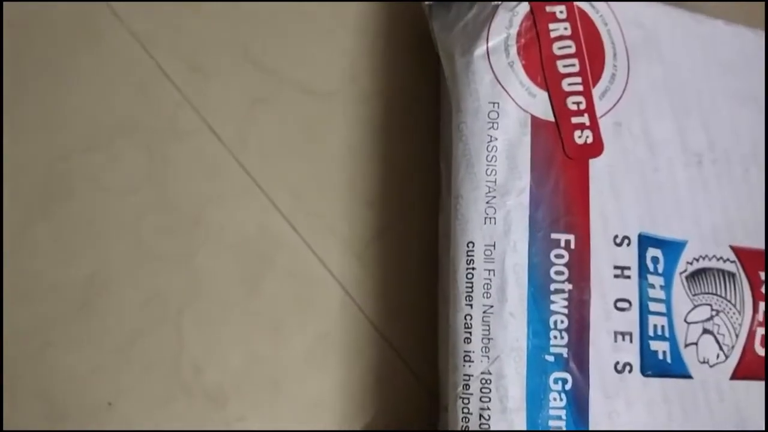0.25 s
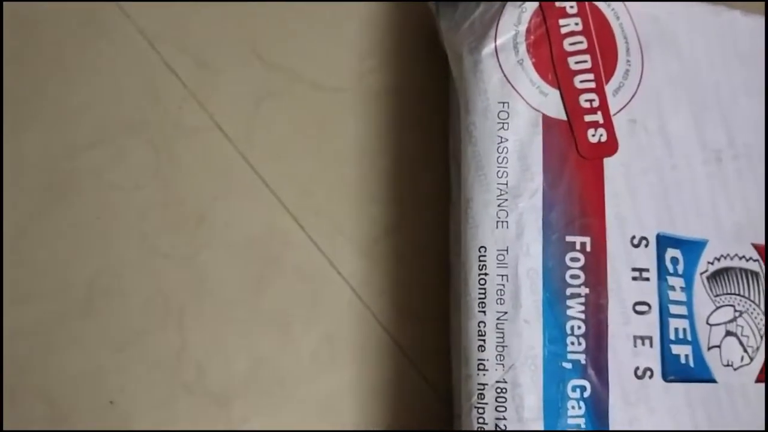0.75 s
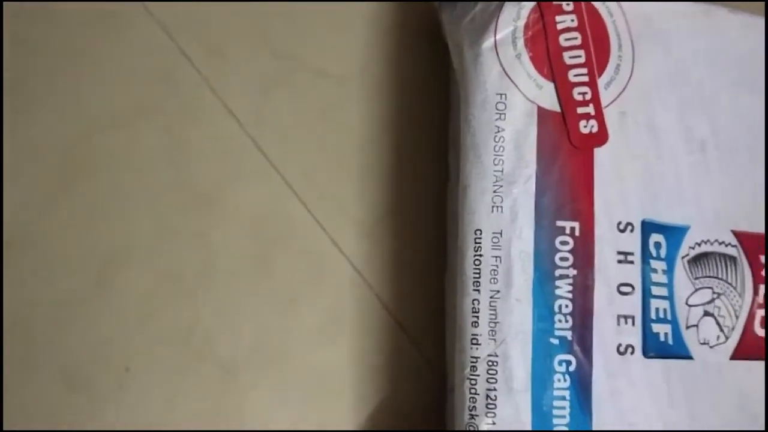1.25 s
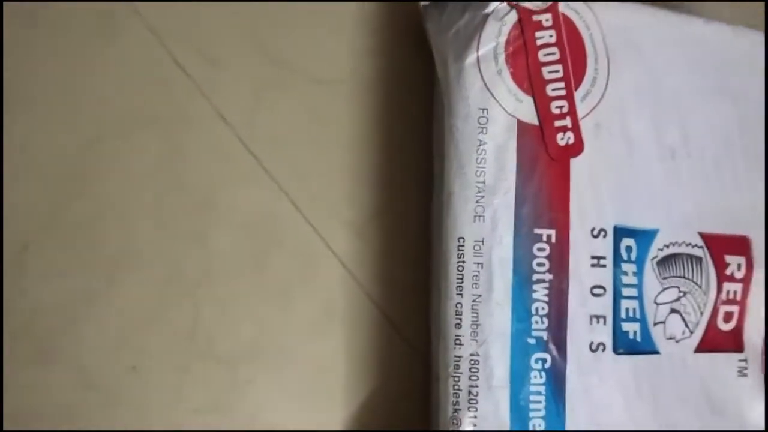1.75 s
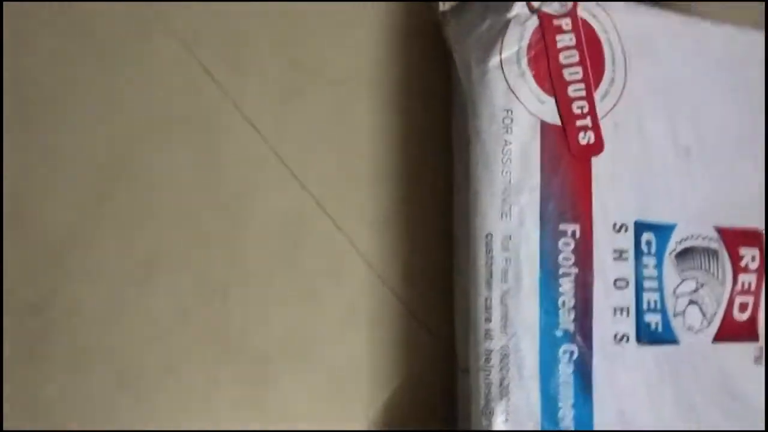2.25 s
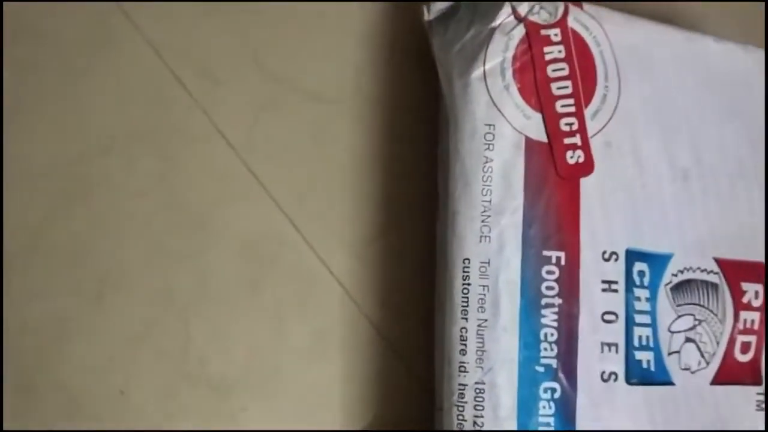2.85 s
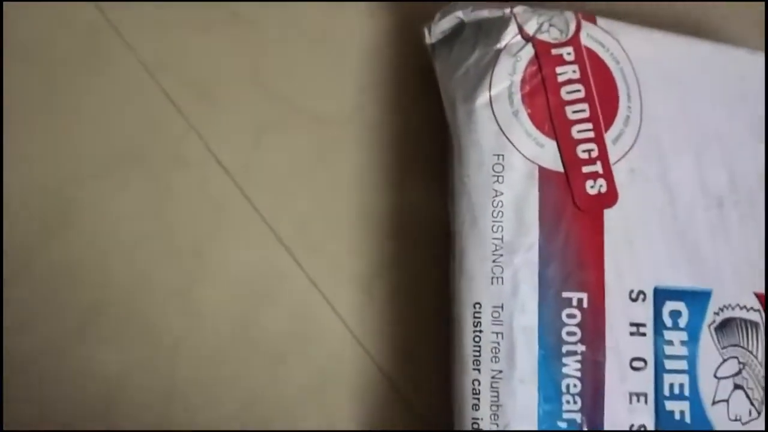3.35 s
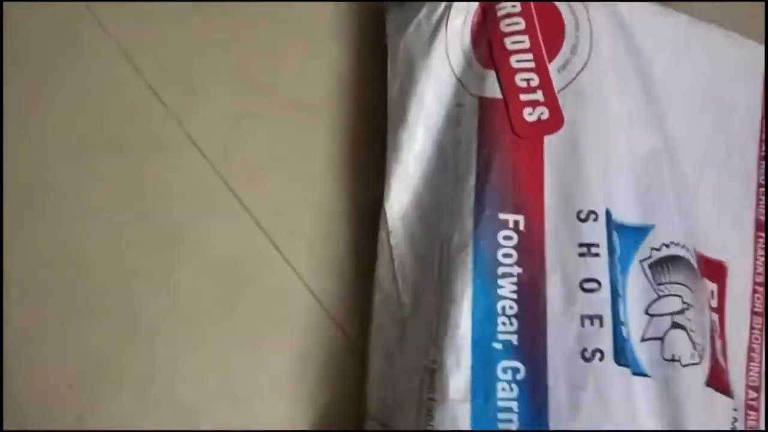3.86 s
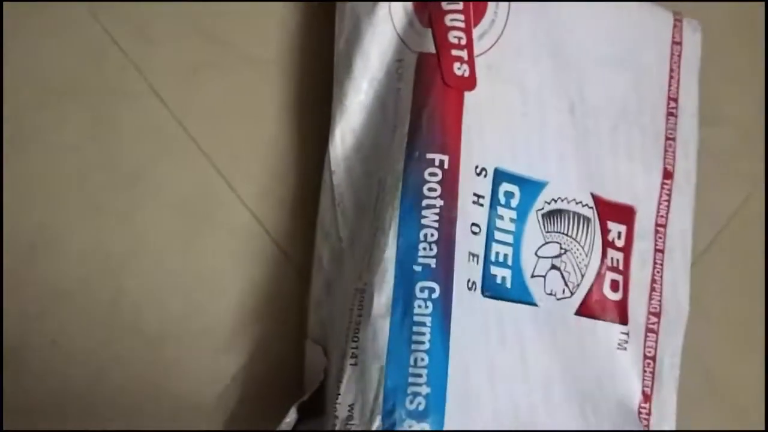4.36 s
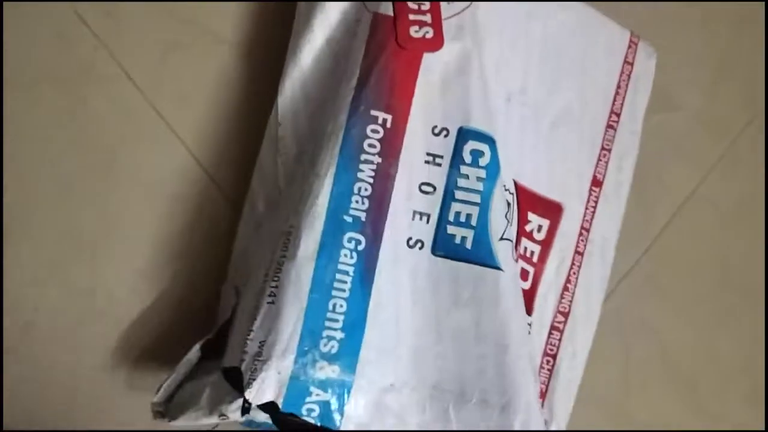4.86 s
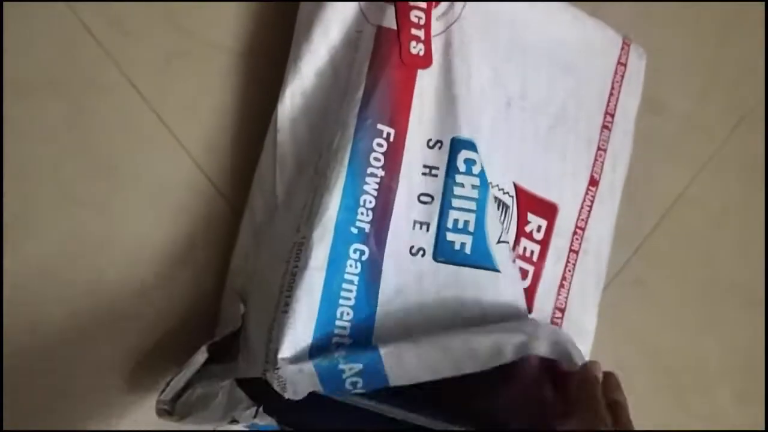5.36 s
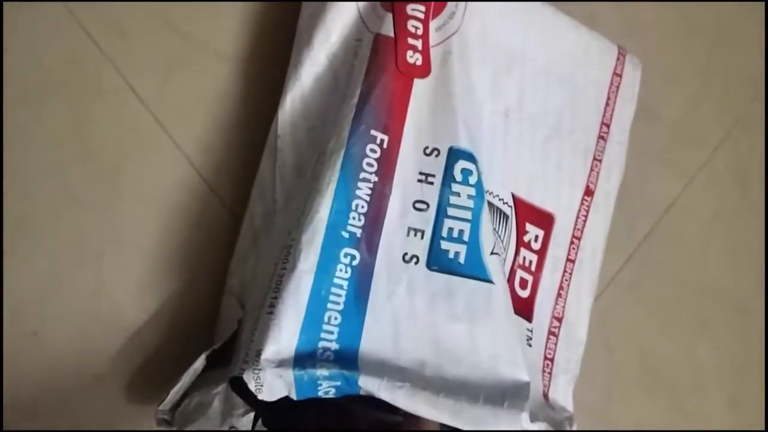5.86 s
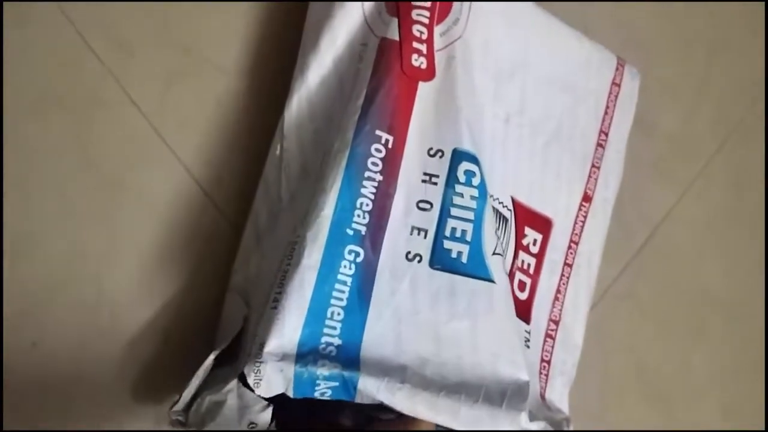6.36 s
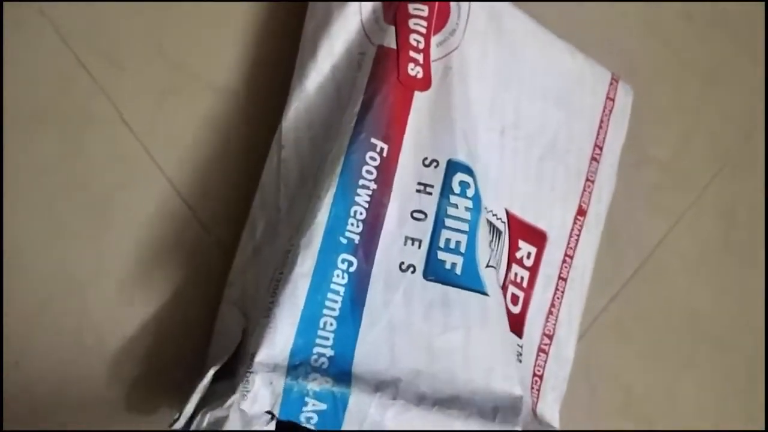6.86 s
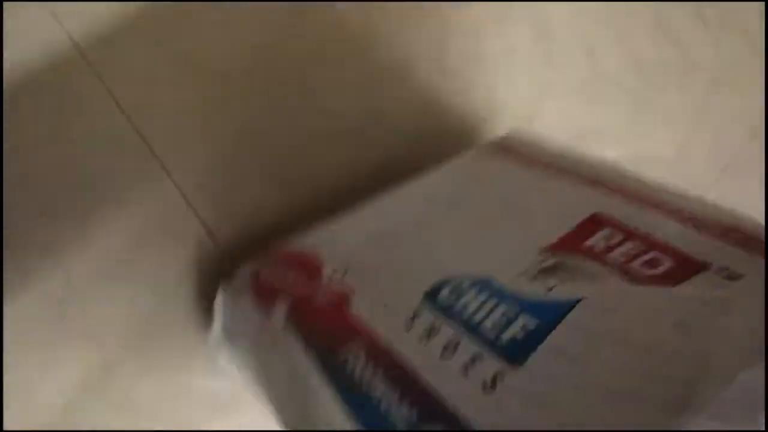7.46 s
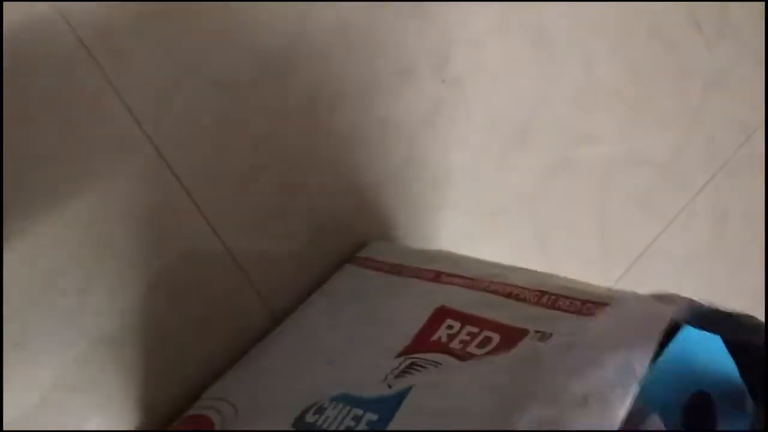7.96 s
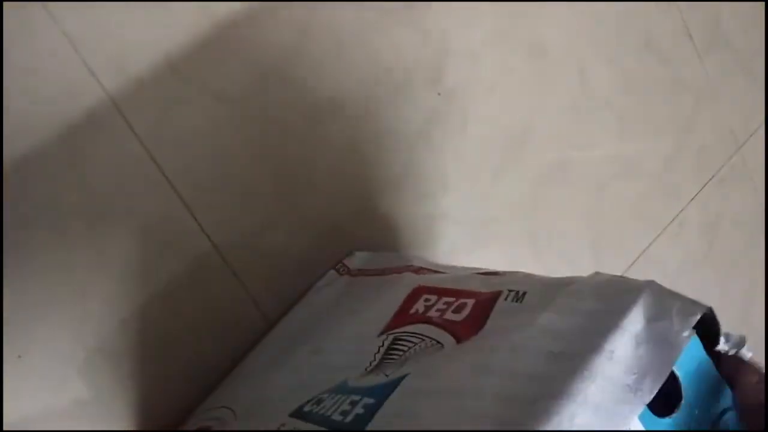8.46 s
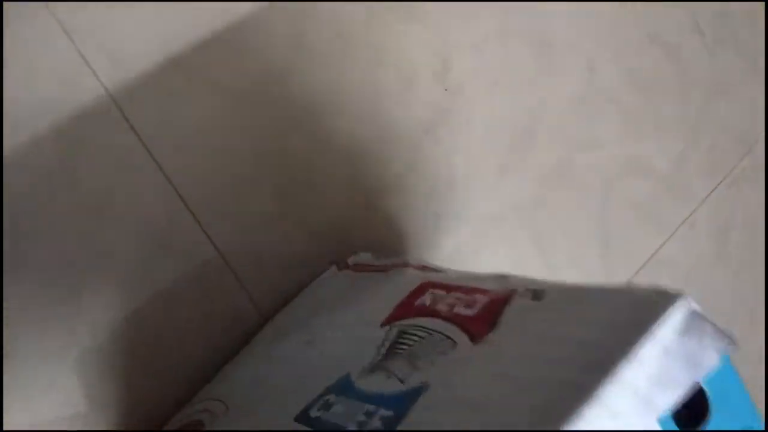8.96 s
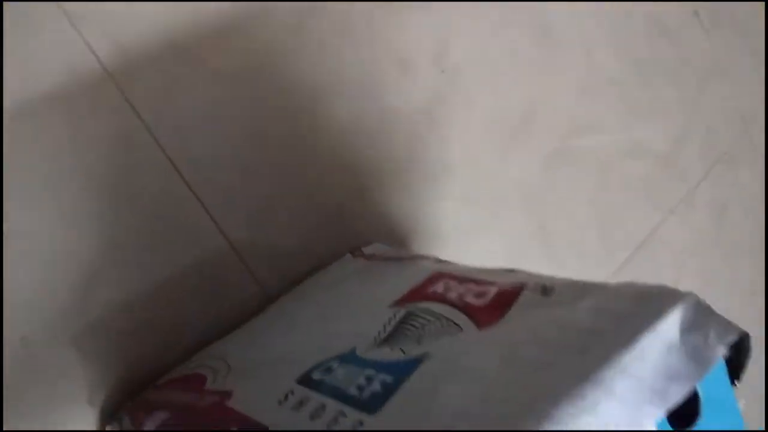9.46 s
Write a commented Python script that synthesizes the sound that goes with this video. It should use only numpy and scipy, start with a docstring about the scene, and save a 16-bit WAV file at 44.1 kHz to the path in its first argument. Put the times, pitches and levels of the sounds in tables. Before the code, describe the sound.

Scissors snip sharply four times through a plastic mailing bag, then crisp film crackles and crunches as a cardboard box is dragged out with hollow knocks.

```python
"""A box knocks and film stirs briefly; then scissors make four cuts in a plastic shipping bag, close to the microphone
in a bare, hard-floored room. Blade clicks are short noise bursts and the cuts runs of tiny fractures. A faint whine
comes and goes meanwhile. Then the bag is pulled open and a cardboard box worked out of it: grains of noise rustle and
fizz, runs of ticks crunch, creases snap and facets pop. The box drags as hollow noise, knocks as short sines and bumps
down once, ringing its modes. Room reflections and a steady low murmur lie beneath it all."""
import sys
import numpy as np
from scipy import signal
from scipy.fft import rfft, irfft
from scipy.io import wavfile
from scipy.ndimage import uniform_filter1d

SR = 44100
rng = np.random.default_rng(int(sys.argv[2]) if len(sys.argv) > 2 else 0)


def unload_audio(sound):
    """Save the sound as a 16-bit wav file, at the path given as the first command line argument."""
    columns = np.transpose(np.atleast_2d(sound))
    # keep every value between -1 and 1, then stretch to whole-number steps
    steps = np.round(np.clip(columns, -1, 1) * 32767)
    wavfile.write(sys.argv[1], SR, steps.astype(np.int16))


N = 427769
TIME, BINS = np.arange(N) / SR, np.fft.rfftfreq(N, 1 / SR)  # seconds, Hz
EDGE_HZ = 16100  # upper band limit

# Blades catching: start_s, level_db, body_db (relative, up to 2600 Hz), edge_db (relative, from 11500 Hz)
BLADE_CLICKS = [(.5862, -1.5, -6, 1), (.6346, -15.5, -2, 0), (.6765, -7.5, 2, -1), (.6815, -10, 2, -3),
                (1.262, -.3, -1, 8), (1.2725, -14.5, -2, 4), (1.2905, -4, -7, 8), (1.3068, -13, -7, 9),
                (2.3895, -1, -3, 7), (2.4169, -8.5, -3, 6), (2.4603, -16, 6, -3), (2.6354, -8, -3, 5),
                (2.6471, 3.3, -6, 0), (2.7284, -9, -7, 3)]
# Blades shearing the film: start_s, end_s, first_level_db, last_level_db, tilt_db_per_octave,
# film_note_hz (note of the taut film), film_note_height_db
CUTS = [(.607, 0.693, -43.5, -45, -2.5, 6400, 4), (1.258, 1.33, -32.5, -42, 4.5, 11500, -5),
        (2.385, 2.484, -35.5, -46, 3, 9400, -2), (2.652, 2.77, -35, -41.5, 3.5, 5400, 7)]
# Colour of the shearing: frequency_hz, gain_db
SHEAR_SPECTRUM = [(30, -36), (120, -32), (400, -2), (1000, -6), (2300, -0.5), (3800, 0), (5500, -1.5),
                  (8500, -1.5), (12000, -7), (16000, -4)]
# Resonances of the blades, in every click and cut: centre_hz, width_hz, height_db
BLADE_RESONANCES = [(2250, 300, 4), (3350, 300, 4), (4500, 250, 2.5), (6050, 450, 5), (7900, 500, 5),
                    (9200, 500, 7), (11500, 900, 7), (14400, 600, 4)]
FILM_NOTE_WIDTH_HZ = 900


def scissors():
    """The blades catch with a click, then shear through the taut film in a run of tiny fractures."""
    fractures = crackle(per_s=600, spread_db=3.4, clump_db=2, hiss=.18)
    fractures = colour(fractures, lambda hz: read(SHEAR_SPECTRUM, hz) + humps(BLADE_RESONANCES, hz))
    fractures = flex(fractures, patchy_db=3.3)
    shear = np.zeros((2, N))
    for start, end, first_db, last_db, tilt_db, note_hz, note_db in CUTS:
        film_note = [(note_hz, FILM_NOTE_WIDTH_HZ, note_db)]
        cut = fractures[:, int(start * SR):int(end * SR)]
        cut = colour(cut, lambda hz: tilt_db * np.log2(np.maximum(hz, 300)) + humps(film_note, hz))
        squeeze = amp(np.linspace(first_db, last_db, cut.shape[1]))
        soft_ends = signal.windows.tukey(cut.shape[1], .15)
        add(shear, start, unit(cut) * squeeze * soft_ends)
    blades = clicks(BLADE_CLICKS, decay_s=.001, rise_s=.0007, ripple_db=.6, resonances=BLADE_RESONANCES)
    return room(shear, wet_db=-2.5) + room(amp(-1.5) * blades, wet_db=-3.5)


# Shared colour of clicks and snaps: frequency_hz, gain_db
SNAP_SPECTRUM = [(30, -29), (120, -20.5), (400, -22), (900, -9.5), (2000, -2.5), (4000, 2.5), (8000, 0.5),
                 (12000, -0.5), (16000, 0.5)]


def clicks(rows, decay_s, rise_s, ripple_db, resonances=()):
    """Each click is a rattle of a millisecond or two with its own body, edge and ragged spectrum."""
    out, t = np.zeros((2, N)), TIME[:2048]
    shape = (1 - np.exp(-(t / rise_s) ** 2)) * np.exp(-t / decay_s)
    for start, db, body_db, edge_db in rows:
        tint = [(800, body_db), (2600, body_db), (4500, 0), (9000, 0), (11500, edge_db)]
        ripple = np.transpose([np.geomspace(1200, 16000, 22), ripple_db * rng.standard_normal(22)])

        def click_db(hz):
            """Gain of this click in dB: common colour, its own tint and ripple, and resonances."""
            return read(SNAP_SPECTRUM, hz) + read(tint, hz) + read(ripple, hz) + humps(resonances, hz)

        burst = near(rng.standard_normal((2, len(t))) * shape, share=.15)
        burst = colour(burst, click_db)
        energy = np.linalg.norm(burst, axis=1, keepdims=True)
        add(out, start, amp(db) * burst / energy)
    return out


# Colour of crumpling film: frequency_hz, gain_db
RUSTLE_SPECTRUM = [(30, -62), (100, -34), (250, -7), (500, -1.5), (800, -0.5), (1200, -1), (1500, -2.5),
                   (2000, 5.5), (2700, 3), (3600, 4.5), (5500, -2), (8000, -8.5), (16000, -21)]
# Colour of sliding film: frequency_hz, gain_db
FIZZ_SPECTRUM = [(1500, -27), (4000, -1.5), (7000, -0.5), (10000, 0.5), (13000, 1.5), (16000, -3)]
# Creases snapping through: start_s, level_db, body_db (relative, up to 2600 Hz), edge_db (relative, from 11500 Hz)
CREASES = [(.3279, -21, 1, -6), (3.046, -24, 5, -3), (3.1475, -11, -1, -4), (3.1588, -17, -5, -4),
           (3.2376, -17, -4, -6), (3.2646, -19, 6, -4), (3.4142, -19, -1, 4), (3.485, -5.5, 2, 0),
           (3.5764, -13, 4, 2), (3.6177, -7, -1, -13), (3.6796, -10, -1, 7), (3.6864, -8.5, -2, 9),
           (3.6946, -14, -1, -3), (3.8129, -5.5, 3, -3), (3.945, -18, 6, -8), (3.9687, -8.5, 2, 0),
           (3.9906, -3.5, -2, -15), (4.0045, -6, 11, -9), (4.0174, -14, 6, -3), (4.0575, -12, -6, 4),
           (4.1305, -15, -6, -7), (4.1365, -11, -10, -7), (4.2651, -10.5, 7, -5), (4.2765, -16, -1, -4),
           (4.3314, -12, 0, -2), (4.4037, -12, 4, -5), (4.4113, -11, 0, -4), (4.4157, -6, -2, -2),
           (4.4212, -7, -2, -12), (4.487, -6, 3, 6), (4.4938, -13, 3, -3), (4.5721, -12, 2, -1),
           (4.624, -13.5, 1, -6), (4.6471, -6, 0, -1), (4.679, -7.5, -9, -4), (4.7148, -14, 6, -2),
           (4.739, -5, -1, 3), (4.8967, -7, 10, -7), (5.0156, -19, 9, -2), (5.044, -15, -3, -3),
           (5.0513, -5, -7, 0), (5.1142, -11, -4, -3), (5.1228, -2.5, 1, 1), (5.1742, -3.5, 3, 5),
           (5.195, -7, 8, -5), (5.2737, -.5, -5, -7), (5.285, -7.5, 0, -8), (5.2885, -7, 1, -8),
           (5.3076, -4, 1, -10), (5.36, .5, -3, -1), (5.3708, -10, -4, -8), (5.4318, -10, -9, -4),
           (5.517, -17, 4, -4), (5.8956, -16, -3, -3), (5.8996, -17, 0, -3), (6.0616, -11.5, -6, -1),
           (6.15, -20, -2, -2), (6.759, -23, 3, -8), (6.8253, -21, 3, -8), (7.0322, -13.5, 11, -9),
           (7.046, -17, 4, 0), (7.0535, -14, -3, -2), (7.0918, -11.5, -5, 1), (7.3009, -13, 2, 2),
           (7.3553, -15, 2, 2), (7.4333, -10, 3, 4), (7.489, -16.5, 11, -4), (7.9165, -19, 8, 2),
           (8.135, 0, -1, 5), (8.2168, -13, -2, -2), (8.3722, -5, -9, 2), (8.382, -9, -5, -4),
           (8.3925, -4.5, -5, 0), (8.3952, 0, -3, -1), (8.4303, -15, 3, -7), (8.4737, -13, -1, -3),
           (8.4872, -11, -1, -5), (8.506, -7.5, 5, -6), (8.5469, .5, -7, 6), (8.5513, -6, -6, 0),
           (8.6319, -14, 5, -6), (8.6468, -11, 6, -7), (8.6572, -3.5, -2, -15), (8.6888, -12, 9, -3),
           (8.7192, -13, 10, -3), (8.8015, -7.5, 1, -1), (8.8142, -6, 4, 1), (8.8205, -14, 6, 0),
           (8.8828, -13, 1, -8), (8.9465, -8, 2, -2), (8.951, -1.3, 3, -2), (8.9936, -10, -5, -4),
           (9.034, -8, 2, -12), (9.0654, -14, 9, -3), (9.1871, -20, 7, -1), (9.4256, -19, 11, 4),
           (9.638, -13, 4, -8), (9.67, -18, 6, -3)]
# Wider facets of film popping with a hollow note: start_s, level_db, pitch_hz
POPS = [(1.8971, -42, 1100), (2.6469, -24, 2350), (4.2647, -30, 2400), (4.3171, -28, 2070),
        (4.5396, -25, 1750), (4.8958, -22.5, 1690), (4.9367, -28, 1760), (5.0434, -25, 1700),
        (5.1741, -24, 1900), (5.65, -35, 1900), (5.7099, -33, 1500), (5.7335, -33, 1800),
        (5.8125, -31, 1650), (6.0613, -24, 1950), (7.0225, -32, 2050), (7.0308, -21, 1820),
        (7.038, -22, 1980), (7.2814, -26, 2130), (7.4884, -32, 1660), (7.6317, -34, 1900),
        (7.646, -26.5, 1950), (7.6804, -19, 2260), (7.8835, -27, 1840), (8.2796, -23, 2300),
        (8.6467, -24, 2000), (8.7205, -26, 2500), (8.8413, -20, 2200), (8.9121, -24, 2310)]
TICK_SHARE = .55  # share of ticks in the rustle, 0-1


def bag(rustle_gain, fizz_gain):
    """Crumpling film rustles and ticks, sliding film fizzes, folds crunch, and single creases snap or pop."""
    buckles = crackle(per_s=500, spread_db=3.1, clump_db=2.1, hiss=.2)
    rustle = flex(colour(buckles, lambda hz: read(RUSTLE_SPECTRUM, hz)), patchy_db=3)
    rustle = np.sqrt(1 - TICK_SHARE ** 2) * rustle + TICK_SHARE * ticks(per_s=170, spread_db=3.8)
    slips = crackle(per_s=800, spread_db=3, clump_db=1.6, hiss=.55)
    fizz = flex(colour(slips, lambda hz: read(FIZZ_SPECTRUM, hz)), patchy_db=3.5)
    film = amp(-2.5) * rustle_gain * rustle + amp(-1.4) * fizz_gain * fizz
    film = moving_room(film + amp(-1.4) * crunches(), wet_db=-2.4)
    snaps = clicks(CREASES, decay_s=.0011, rise_s=.0006, ripple_db=2.6)
    facets = pops(POPS + small_pops(rustle_gain, count=90))
    return film + room(amp(0.9) * snaps, wet_db=-4) + room(amp(-0.8) * facets, wet_db=-6.5)


def crackle(per_s, spread_db, clump_db, hiss):
    """Tiny buckles of the film, in clumps and of unequal size, over the hiss of sliding."""
    at = np.flatnonzero(rng.random(N) < per_s / SR)
    size = amp(spread_db * np.minimum(rng.exponential(1, N), 2.8))[at, None]
    decay_s = .0008 * rng.uniform(.35, 1.65, N)[at, None]
    # every buckle has its own ragged spectrum and dies within a few milliseconds
    place = at[:, None] + np.arange(200)
    grains = rng.standard_normal((2, *place.shape)) * size * np.exp(-TIME[:place.shape[1]] / decay_s)
    buckles = np.array([np.bincount(place.ravel(), port.ravel(), N)[:N] for port in grains])
    film = unit(buckles) + hiss * rng.standard_normal((2, N))
    clumps = amp(clump_db * wander(45))
    return unit(near(film * clumps, share=0.02))


def flex(x, patchy_db):
    """As the film changes shape, its resonances come and go in patches of some 400 Hz by 25 ms."""
    z = signal.stft(x, SR, nperseg=512, noverlap=384)[2]
    field = rng.standard_normal(z.shape[1:])
    for _ in range(2):
        field = uniform_filter1d(field, size=4, axis=0)  # across frequency
        field = uniform_filter1d(field, size=7, axis=1)  # across time
    flexed = signal.istft(z * amp(patchy_db * unit(field)), SR, nperseg=512, noverlap=384)[1]
    return unit(flexed[:, :N])


# Each tick is a tiny patch of film with its own pitch; it decays to 1/e in so many cycles
TICK_LOW_HZ, TICK_HIGH_HZ, TICK_CYCLES = 1100, 7500, 2.2


def ticks(per_s, spread_db):
    """Patches of film flip one after another; each rings for a few cycles with three partials of its own."""
    at = np.flatnonzero(rng.random(N) < per_s / SR)
    t, out = TIME[:256], np.zeros((2, N))
    place = (at[:, None] + np.arange(len(t))).ravel()
    pitch = TICK_LOW_HZ * (TICK_HIGH_HZ / TICK_LOW_HZ) ** rng.random((len(at), 1))
    size = amp(spread_db * np.minimum(rng.exponential(1, pitch.shape), 2.5)) * np.sqrt(pitch)
    for k in range(3):
        hz = np.minimum(pitch * (1 + k * rng.uniform(.3, .7, pitch.shape)), EDGE_HZ)
        phase = rng.random((2, len(at), 1))  # in cycles, unrelated at the two ports
        envelope = np.exp(-t * pitch / TICK_CYCLES) * (1 - np.exp(-t * hz))
        rings = size / (1 + k) * np.sin(2 * np.pi * (hz * t + phase)) * envelope
        out += [np.bincount(place, port.ravel(), N)[:N] for port in rings]
    return unit(near(out, share=.3))


# Folds collapsing in a short flurry of ticks: start_s, length_s, level_db, centre_hz
CRUNCHES = [(3.475, 0.019, -33, 4950), (3.525, 0.024, -37, 3340), (3.567, 0.031, -37.5, 3500),
            (3.642, 0.022, -38, 5500), (3.779, 0.024, -37, 7000), (3.839, 0.029, -32.5, 3900),
            (4.417, 0.044, -42, 3880), (4.557, 0.051, -50, 3700), (4.616, 0.021, -37, 4000),
            (4.798, .012, -40, 3200), (4.852, 0.025, -46, 3030), (4.932, 0.018, -34, 2600),
            (5.185, 0.022, -29.5, 2800), (5.226, 0.027, -49, 2800), (5.284, 0.026, -33, 4030),
            (5.32, 0.027, -41, 3600), (5.361, 0.0135, -36, 3620), (5.901, .012, -49, 2700),
            (7.653, 0.027, -33.5, 2200), (7.689, 0.027, -40, 2300), (8.2, 0.015, -46, 2800),
            (8.256, .018, -42, 3300), (8.291, 0.06, -34.5, 3000), (8.465, 0.022, -36.5, 3170),
            (8.485, 0.032, -35.5, 2600), (8.638, 0.021, -35, 2800), (8.99, 0.043, -39, 5000)]
CRUNCH_SKIRT_DB_PER_OCT = -5


def crunches():
    """Each collapsing fold is a dense run of ticks around the pitch of that fold."""
    out, run = np.zeros((2, N)), ticks(per_s=550, spread_db=3)
    for start, length, db, centre_hz in CRUNCHES:
        part = run[:, int(start * SR):][:, :int(length * SR)]
        part = colour(part, lambda hz: CRUNCH_SKIRT_DB_PER_OCT * abs(np.log2((hz + 1) / centre_hz)))
        soft_ends = signal.windows.tukey(part.shape[1], .5)
        add(out, start, amp(db) * unit(part * soft_ends))
    return out


def pops(rows):
    """A facet flips over and rings for a few milliseconds around its note."""
    out, t = np.zeros((2, N)), TIME[:2048]
    for start, db, pitch in rows:
        note = np.sin(2 * np.pi * pitch * t) * np.exp(-t / .0019)
        rattle = rng.standard_normal((2, len(t))) * np.exp(-t / .0018)
        rattle = colour(rattle, lambda hz: -15 * abs(np.log2((hz + 1) / pitch)))
        pop = near(np.array([note, note]), share=1) + .85 * rattle / abs(rattle).max()
        pop = pop * (1 - np.exp(-t / .0013))  # soft onset
        add(out, start, amp(db) * pop / abs(pop).max())
    return out


# Lesser pops come by chance, as strong as the rustle around them allows
SMALL_POP_HZ, SMALL_POP_SPREAD_OCT, SMALL_POP_OVER_RUSTLE_DB = 1920, 0.17, 7


def small_pops(rustle_gain, count):
    """Rows of chance pops (start_s, level_db, pitch_hz) whose strength follows the rustle."""
    when, size, note = rng.random((count, 3)).T
    at = (when * (N - 1)).astype(int)
    db = 20 * np.log10(rustle_gain[at] * (.5 + size) + 1e-9) + SMALL_POP_OVER_RUSTLE_DB
    pitch = SMALL_POP_HZ * 2 ** (SMALL_POP_SPREAD_OCT * (2 * note - 1))
    return list(zip(TIME[at], db, pitch))


# Abrupt tugs at the bag: start_s, hold_s, rustle_db, fizz_db, drag_db (drag of the box)
TUGS = [(0, 0.017, -50.5, -60, -50), (3.033, 0.07, -54.5, -49, -74), (3.48, 0.17, -42, -38.5, -42.5),
        (3.956, 0.11, -38, -41.5, -43.5), (4.124, 0.041, -60, -49, -49.5), (4.255, 0.14, -45.5, -51.5, -46),
        (4.404, 0.12, -35, -40, -41), (4.539, 0.16, -38.5, -37, -50), (4.91, 0.1, -38.5, -40, -46),
        (5.185, 0.065, -36.5, -42, -47.5), (5.258, 0.084, -51, -45, -43.5), (5.514, 0.072, -48, -49, -56),
        (5.883, 0.044, -41.5, -40.5, -43.5), (6.041, 0.13, -50, -47.5, -56.5),
        (6.215, 0.13, -52, -59, -59.5), (6.533, 0.058, -49.5, -58, -54), (7.027, 0.069, -57, -43, -60),
        (7.418, .015, -62, -61, -41), (7.482, 0.0083, -41.5, -67, -33.5), (7.629, 0.035, -38, -35.5, -43.5),
        (7.681, 0.029, -31.5, -28.5, -33.5), (8.097, 0.078, -35, -37, -48), (8.39, 0.042, -33.5, -53, -41),
        (8.782, 0.13, -37.5, -40, -48.5), (8.941, 0.09, -38.5, -37.5, -43), (9.65, 0.065, -50, -64, -67)]
# Film sliding over the box in smooth swells: start_s, length_s, rustle_db, fizz_db, drag_db (drag of the box)
SLIDES = [(0.086, 0.2, -53.5, -48.5, -53.5), (0.27, .13, -54.5, -49.5, -54.5),
          (0.391, 0.2, -58.5, -56, -58), (0.556, 0.22, -69, -68, -48), (1.185, 0.24, -61, -56, -78),
          (1.402, 0.1, -54.5, -49.5, -78), (2.041, 0.18, -48.5, -46, -76), (2.527, 0.19, -62, -53, -78),
          (2.8, 0.19, -62, -50.5, -84), (3.095, 0.26, -43.5, -41, -50.5), (3.332, 0.16, -44, -40.5, -48.5),
          (3.612, 0.25, -38.5, -39.5, -50), (3.75, 0.14, -37, -37, -45), (3.887, 0.095, -43.5, -44, -51),
          (4.14, 0.12, -60, -71, -57), (4.713, 0.19, -42, -41, -52.5), (5.028, 0.24, -40.5, -39.5, -48.5),
          (5.33, 0.2, -42, -40.5, -50), (5.64, 0.19, -50, -52.5, -52), (5.783, 0.11, -56, -45, -47),
          (6.37, 0.13, -53.5, -52.5, -70), (6.67, 0.23, -50, -54, -57), (6.802, 0.11, -51.5, -54, -57),
          (6.9, 0.21, -47.5, -52, -54), (7.066, 0.26, -43.5, -38, -47), (7.262, 0.11, -43, -39, -56),
          (7.343, 0.15, -43, -42.5, -53.5), (7.527, 0.19, -64, -56, -54.5), (7.866, 0.13, -46, -42, -46),
          (7.977, 0.13, -46.5, -45.5, -53), (8.177, 0.23, -36, -37, -42), (8.446, 0.17, -35, -35, -47),
          (8.587, 0.22, -36, -40, -45.5), (9.032, 0.39, -43, -42.5, -52.5), (9.34, 0.48, -48, -43, -54)]


def handling():
    """Every tug and slide drives three sounds at once: gains of rustle, fizz and drag."""
    gains = np.zeros((3, N))
    for shape, rows in ((tug, TUGS), (swell, SLIDES)):
        for start, length, *levels_db in rows:
            gains += amp(levels_db)[:, None] * shape(start, length)
    return gains


TUG_ATTACK_S, TUG_SAG_DB, TUG_RELEASE_S = 0.011, -3, 0.041  # release: time to fall to 1/e


def tug(start, hold):
    """Gain of a tug: a quick rise, a sag as the film gives, then it dies away."""
    t = np.maximum(TIME - start, 0)
    rise = np.minimum(t / TUG_ATTACK_S, 1)
    sag = amp(TUG_SAG_DB * np.minimum(t / hold, 1))
    return rise * sag * np.exp(-np.clip(t - hold, 0, 1) / TUG_RELEASE_S)


SWELL_ARCH = 0.5  # exponent of the swell: lower is flatter


def swell(start, length):
    """Gain of one arch, as when the hand speeds up and slows down in a slide."""
    u = np.clip((TIME - start) / length, 0, 1)
    return (4 * u * (1 - u)) ** SWELL_ARCH


# Colour of the dragging box: frequency_hz, gain_db
HOLLOW_SPECTRUM = [(60, -43), (125, -36), (175, -8.5), (240, -2.5), (340, -4), (450, -6.5), (600, -14.5),
                   (900, -13.5), (1500, -23), (4000, -27.5)]
# Knocks on the box: start_s, level_db, pitch_hz (of the struck panel)
KNOCKS = [(.052, -25.5, 260), (3.116, -31, 293), (3.36, -21.5, 248), (4.32, -20, 233), (4.412, -28, 233),
          (5.199, -19.5, 257), (5.734, -20, 257), (5.762, -20, 257), (5.778, -35, 245), (5.814, -18, 280),
          (6.576, -31.5, 283), (6.863, -29, 259), (7.178, -23, 280), (7.271, -35, 243), (7.632, -41, 326),
          (7.681, -16.5, 328), (8.053, -21.5, 345), (8.581, -30, 297), (8.714, -24, 346),
          (8.95, -19.5, 332), (9.499, -27.5, 278)]
# The box bumping down: start_s, level_db
BUMP = (7.682, -30.7)
# Modes of the box: frequency_hz, relative_db, t60_s
BOX_MODES = [(246, -11, 0.33), (323, 2.5, 0.13), (440, 2.5, 0.077), (515, 0, 0.079), (620, -14, 0.072),
             (1030, -26, 0.067), (1250, -27.5, 0.055)]


def box(drag_gain):
    """Cardboard drags with a hollow murmur; fingers knock its panels; a bump rings all its modes."""
    drag = drag_gain * noise(amp(read(HOLLOW_SPECTRUM, BINS)))
    hits, t = np.zeros((2, N)), TIME[:SR // 3]
    for start, db, hz in KNOCKS:
        panel = np.sin(2 * np.pi * hz * t) * (1 - np.exp(-t / 0.0043)) * np.exp(-t / 0.0075)
        add(hits, start, amp(db - 4.0) * np.array([panel, panel]))
    ring = sum(amp(db - 60 * t / t60) * np.sin(2 * np.pi * hz * t) for hz, db, t60 in BOX_MODES)
    bump_s, bump_db = BUMP
    add(hits, bump_s, amp(bump_db) * np.array([ring, ring]))
    # a small box radiates almost no deep bass
    hits = signal.sosfilt(signal.butter(4, 175, "highpass", fs=SR, output="sos"), hits)
    return room(hits, wet_db=-4.5) + drag


# A faint whine that swells and returns: start_s, length_s, level_db
WHINES = [(1.04, .19, -65), (1.27, .3, -69.5), (1.64, .18, -70.5)]
WHINE_HZ, WHINE_WAVER_HZ = 1735, 18  # centre pitch, rms waver


def whine():
    """A sine with a restless pitch, heard only in a few soft swells."""
    gain = sum(amp(db) * swell(start, length) for start, length, db in WHINES)
    pitch = WHINE_HZ + WHINE_WAVER_HZ * wander(20)
    return gain * unit(np.sin(2 * np.pi * np.cumsum(pitch) / SR))


# Colour of the low murmur: frequency_hz, gain_db
ROOM_TONE_SPECTRUM = [(30, -56), (75, -29), (115, -20), (160, -8), (227, 2), (280, -7), (355, -2.5),
                      (430, -8.5), (700, -14), (1400, -17.5), (1900, -13.5), (3000, -17.5), (16000, -27)]
# Narrow bands in the room tone: centre_hz, width_hz, level_db, waver_db
DRONES = [(240, 25, -70.5, 2), (1725, 75, -70, 1.5)]
ROOM_TONE_DB = -56


def room_tone():
    """A steady low murmur of diffuse noise with two narrow, wavering bands in it."""
    tone = amp(ROOM_TONE_DB) * noise(amp(read(ROOM_TONE_SPECTRUM, BINS)))
    for hz, width, db, waver_db in DRONES:
        tone += amp(db + waver_db * wander(1.2)) * narrow(hz, width)
    return tone


# Reverberation: frequency_hz, t60_s
ROOM_T60 = [(200, 0.5), (700, 0.58), (2000, 0.51), (5000, 0.42), (10000, 0.34), (16000, 0.18)]
# The first reflections arrive after a short gap and then build up
ROOM_GAP_S, ROOM_BUILD_S = .002, .003


def reflections(x):
    """The dense reflections of floor and walls, each band dying at its own speed."""
    build_up = np.clip((TIME[:SR] - ROOM_GAP_S) / ROOM_BUILD_S, 0, 1)
    taps = diffuse(rng.standard_normal((2, SR))) * build_up
    hz, t, z = signal.stft(taps, SR, nperseg=256)
    decay = amp(-60 * t / read(ROOM_T60, hz)[:, None])
    tail = signal.istft(z * decay, SR, nperseg=256)[1]
    return signal.fftconvolve(x, tail / np.linalg.norm(tail[0]), axes=1)[:, :N]


def room(x, wet_db):
    """A source at one place in the room: direct sound plus reflections."""
    return x + amp(wet_db) * reflections(x)


BAG_SWAY_HZ = 2.3  # rounds through the four places per second


def moving_room(x, wet_db):
    """A moving source fades through four places, each with its own reflections."""
    places = [np.maximum(np.cos(2 * np.pi * BAG_SWAY_HZ * TIME - k * np.pi / 2), 0) for k in range(4)]
    return x + amp(wet_db) * sum(reflections(x * place) for place in places)


RIGHT_LEAD = 12  # samples by which the right port leads


def near(x, share):
    """Part of a close sound reaches both microphone ports, the right one first."""
    share = np.clip(share, 0, 1)
    late = np.pad(x[1], (RIGHT_LEAD, 0))[:x.shape[1]]
    return np.array([share * late + np.sqrt(1 - share ** 2) * x[0], x[1]])


# Likeness of diffuse sound at the two ports: frequency_hz, likeness (no unit, clipped to 0-1)
LIKENESS = [(130, 1.5), (150, 1), (225, 1), (345, 1), (500, 0.37), (800, 0.05), (1200, 0)]


def diffuse(x):
    """Long waves reach both ports alike, short ones unrelated."""
    z = rfft(x)
    same = np.clip(read(LIKENESS, np.fft.rfftfreq(x.shape[1], 1 / SR)), 0, 1)
    return irfft([z[0], same * z[0] + np.sqrt(1 - same ** 2) * z[1]], x.shape[1])


def noise(gain):
    """Diffuse noise of rms 1 with the given relative gain per bin."""
    return unit(diffuse(irfft(rfft(rng.standard_normal((2, N))) * gain, N)))


def narrow(hz, width):
    """A narrow band of noise of rms 1."""
    return noise(1 / (1 + (2 * (BINS - hz) / width) ** 2))


def wander(rate_hz):
    """Slow random drift of rms 1."""
    return unit(irfft(rfft(rng.standard_normal(N)) / (1 + (BINS / rate_hz) ** 4), N))


def colour(x, db_at):
    """Causal minimum-phase filter with the gain db_at(Hz)."""
    log_gain = np.log(amp(db_at(abs(np.fft.fftfreq(4096, 1 / SR)))))
    taps = np.fft.ifft(np.exp(np.conj(signal.hilbert(log_gain)))).real[:2048]
    return signal.oaconvolve(x, taps[None], axes=1)[:, :x.shape[1]]


def humps(resonances, hz):
    """Gain in dB of resonances given as (centre_hz, width_hz, height_db)."""
    return sum(db / (1 + (2 * (hz - centre) / width) ** 2) for centre, width, db in resonances)


def read(points, hz):
    """Reads a spectrum on a log-frequency axis."""
    f, value = np.transpose(points)
    return np.interp(np.log(hz + 1), np.log(f + 1), value)


def amp(db):
    """Decibels to gain."""
    return 10 ** (np.asarray(db) / 20)


def unit(x):
    """Scales to rms 1."""
    return x / np.sqrt(np.mean(x ** 2) + 1e-20)


def add(mix, start, sound):
    """Mixes a stereo sound in at a start time in seconds."""
    part = mix[:, max(round(start * SR), 0):][:, :sound.shape[1]]
    part += sound[:, :part.shape[1]]


def scene():
    """All sources at the two ports."""
    rustle_gain, fizz_gain, drag_gain = handling()
    return scissors() + bag(rustle_gain, fizz_gain) + box(drag_gain) + whine() + room_tone()


# Colour difference of the two ports: frequency_hz, left_minus_right_db
PORT_BALANCE = [(60, -1), (250, 2.5), (500, 2.5), (1000, -2.5), (2000, 4), (4000, 1.5), (8000, -1.2),
                (13000, 2)]


def record(dry):
    """The ports differ a little in colour; then the band limit."""
    port_db = np.outer([.5, -.5], read(PORT_BALANCE, BINS))
    ports = irfft(rfft(dry) * amp(port_db), N)
    band_limit = signal.firwin(511, EDGE_HZ, window=("kaiser", 9), fs=SR)
    return signal.oaconvolve(ports, band_limit[None], "same")


dry = scene()
out = record(dry)
unload_audio(out)
```